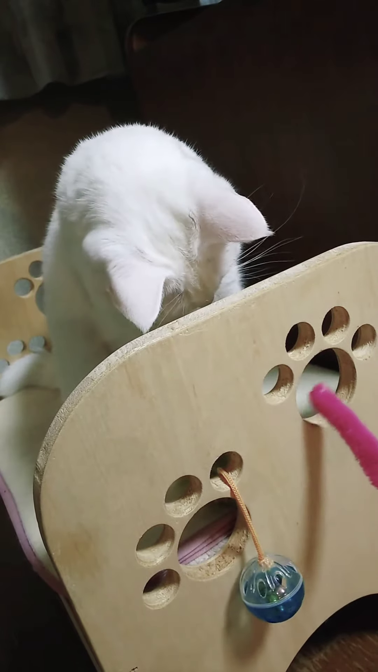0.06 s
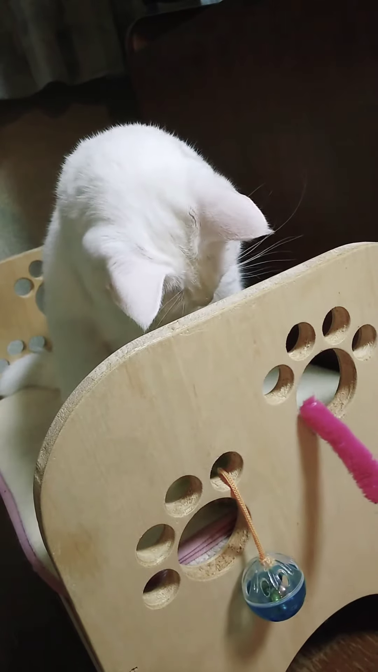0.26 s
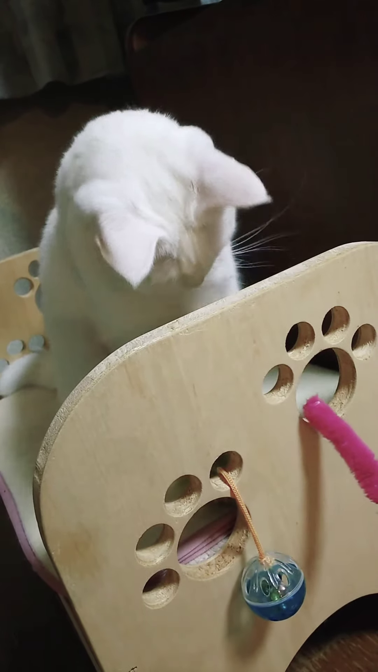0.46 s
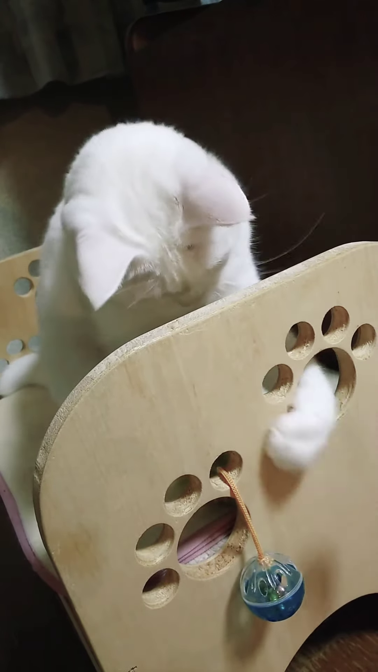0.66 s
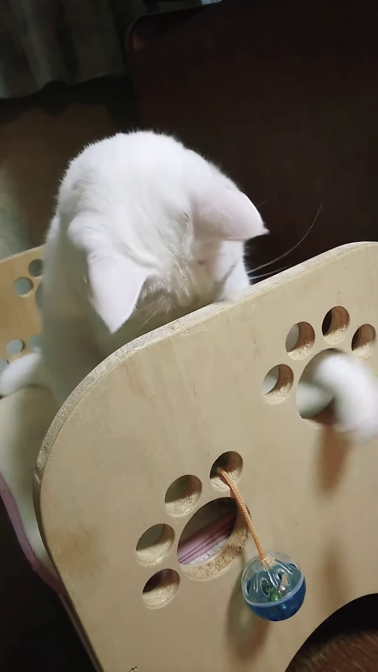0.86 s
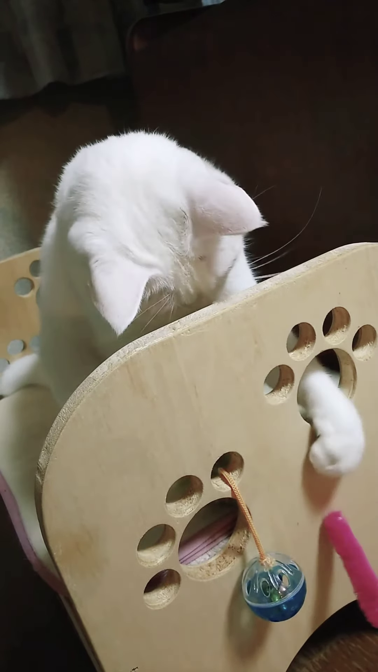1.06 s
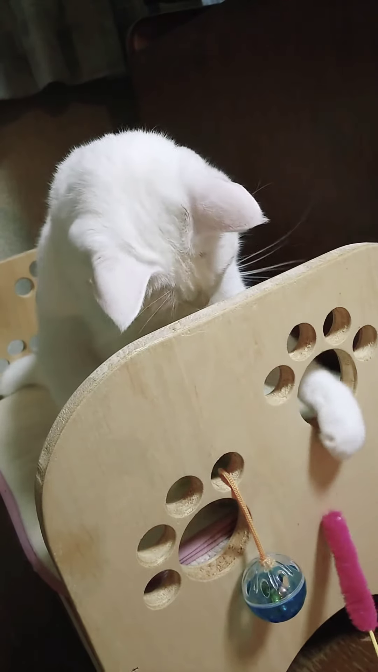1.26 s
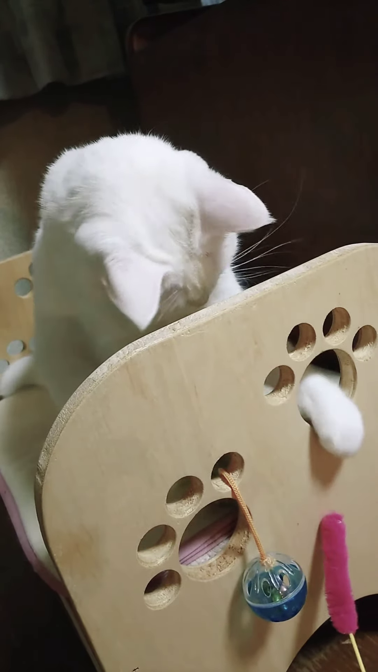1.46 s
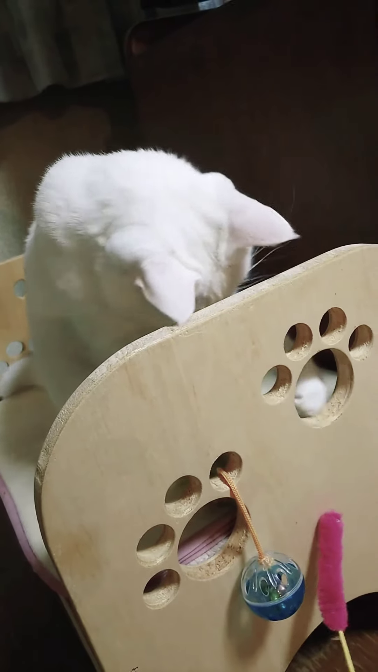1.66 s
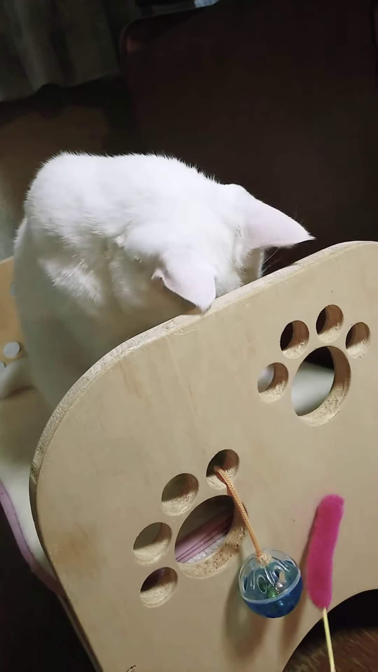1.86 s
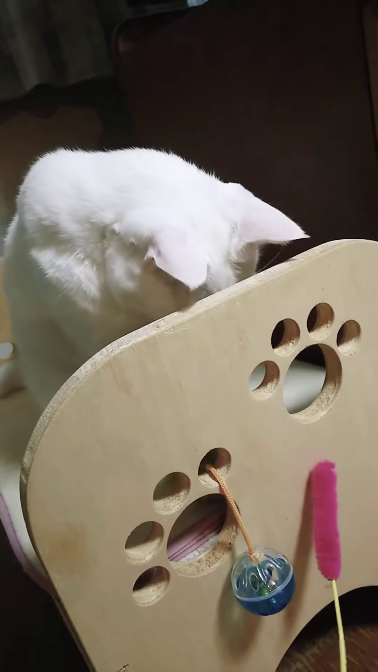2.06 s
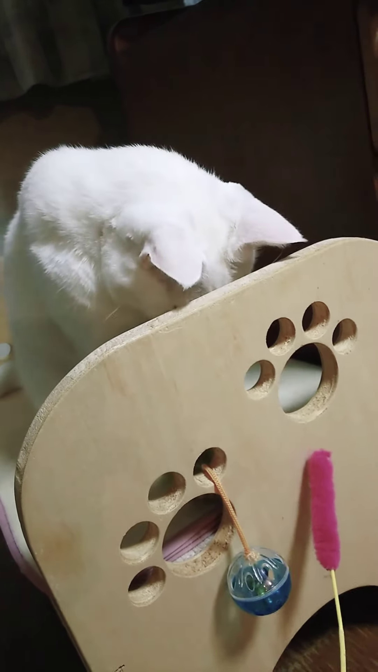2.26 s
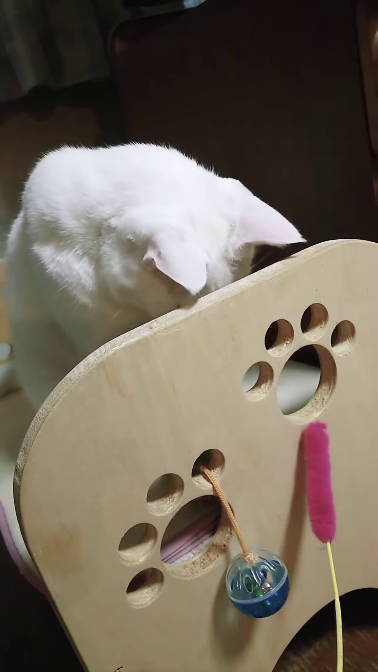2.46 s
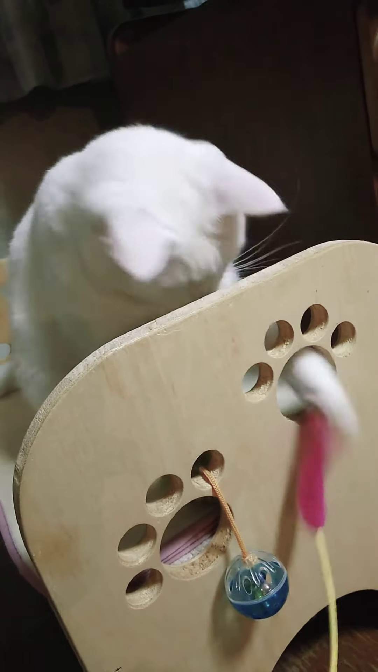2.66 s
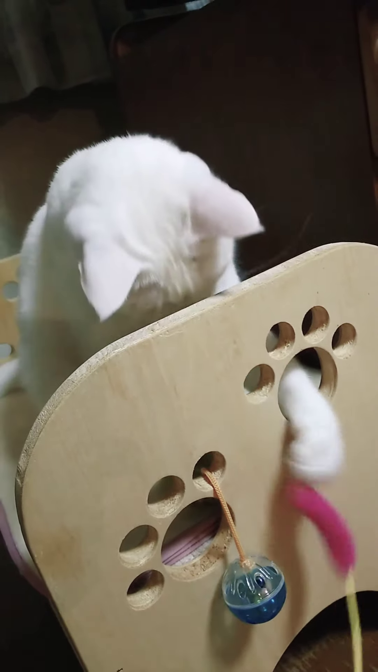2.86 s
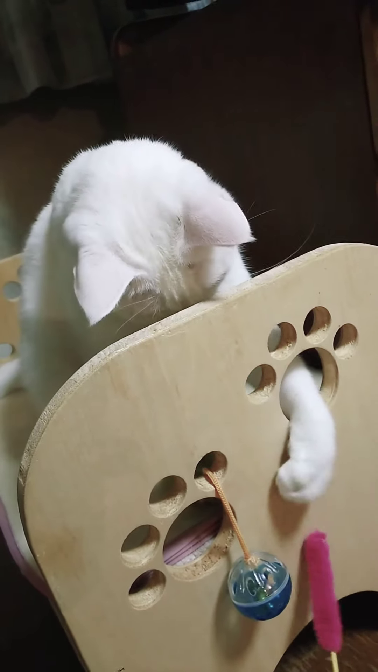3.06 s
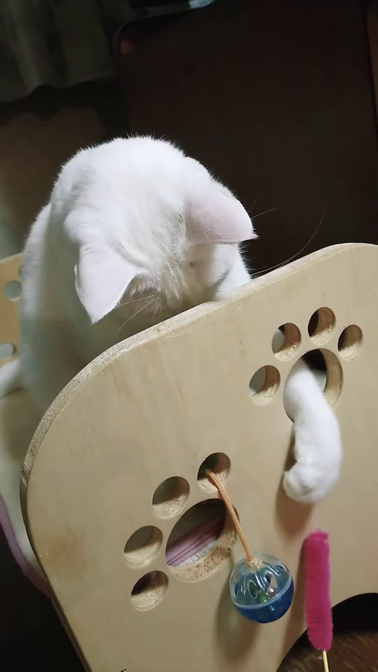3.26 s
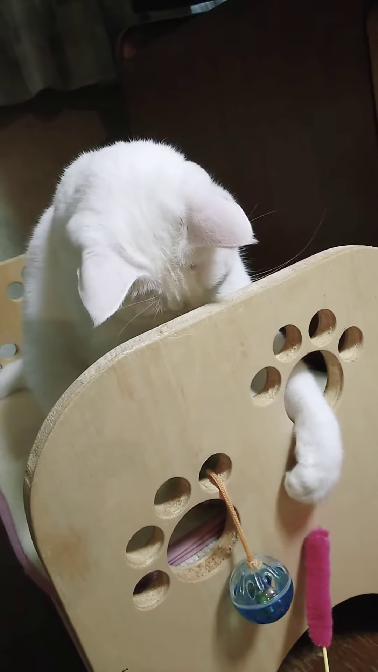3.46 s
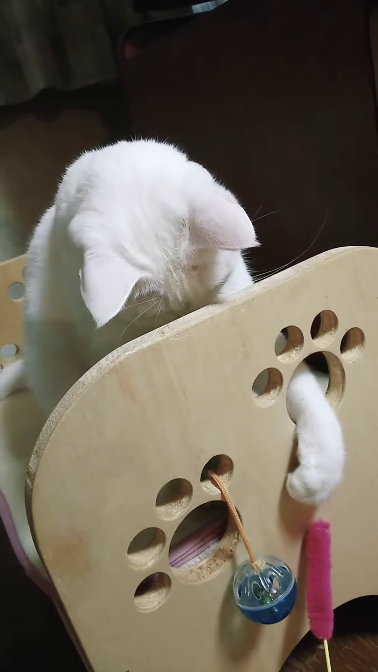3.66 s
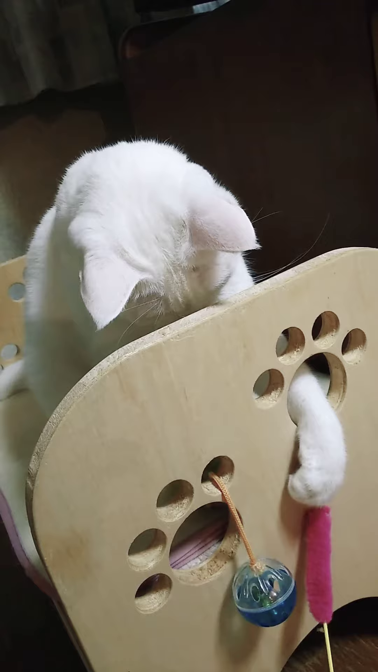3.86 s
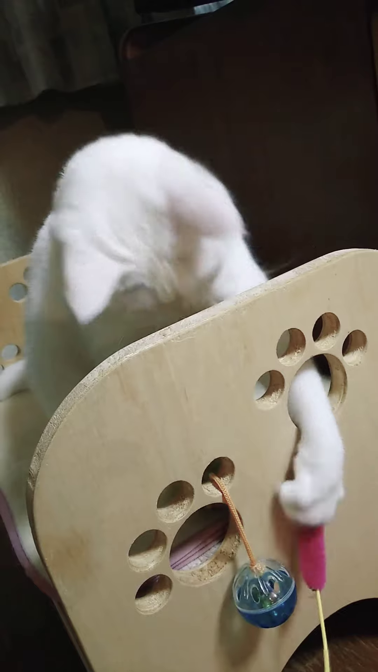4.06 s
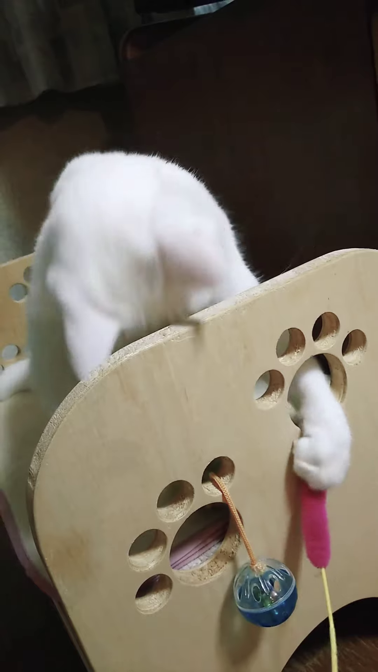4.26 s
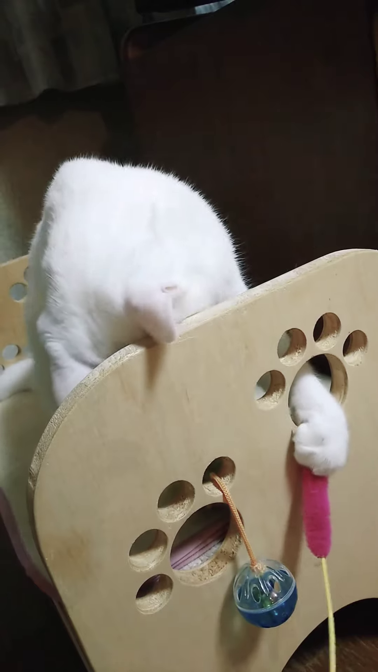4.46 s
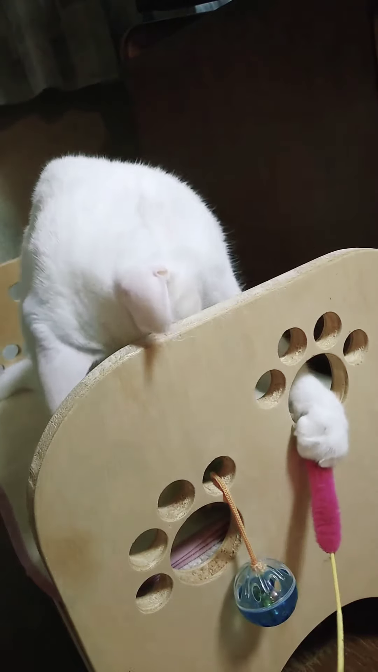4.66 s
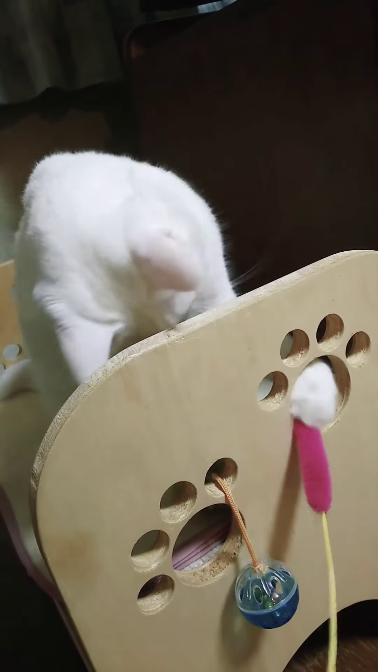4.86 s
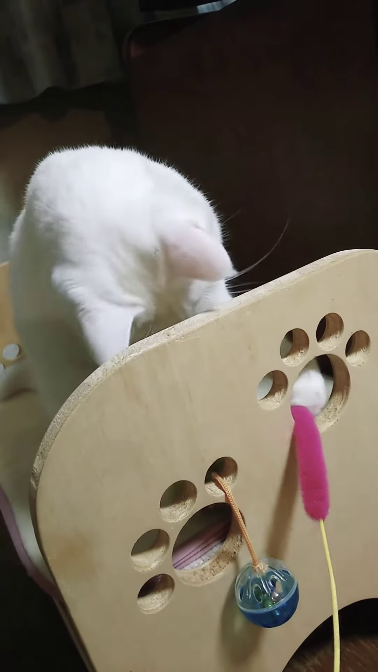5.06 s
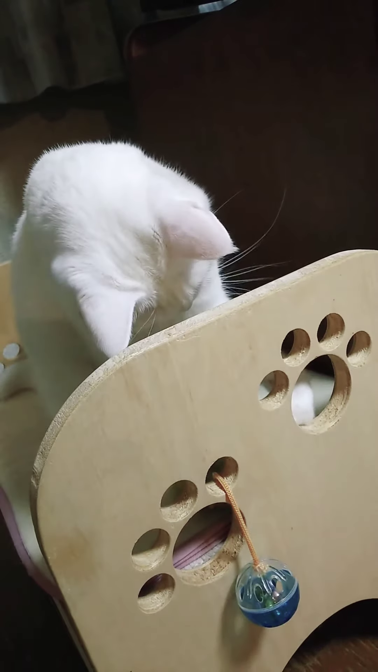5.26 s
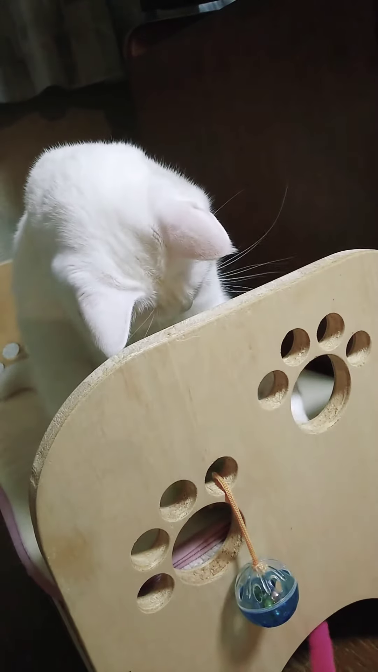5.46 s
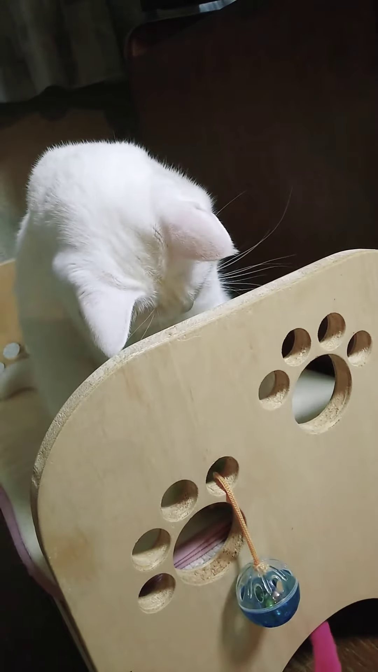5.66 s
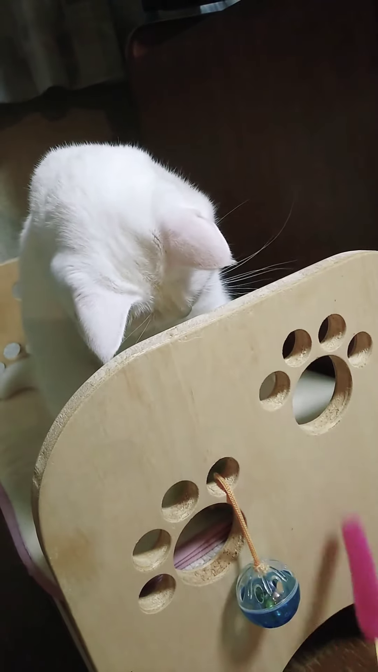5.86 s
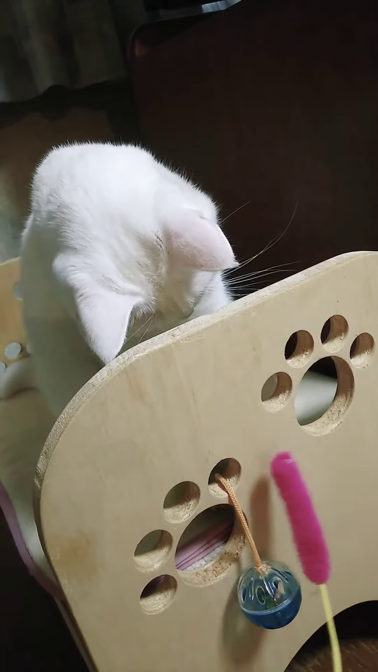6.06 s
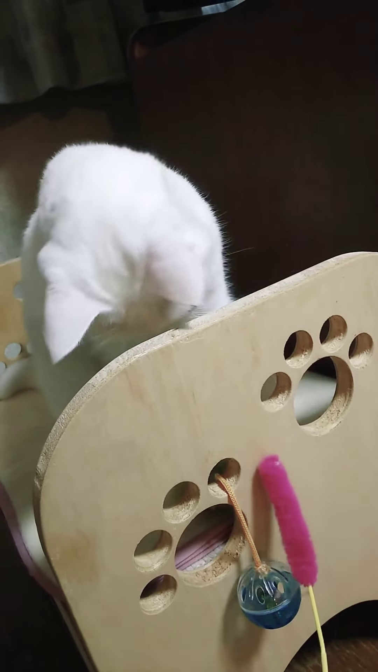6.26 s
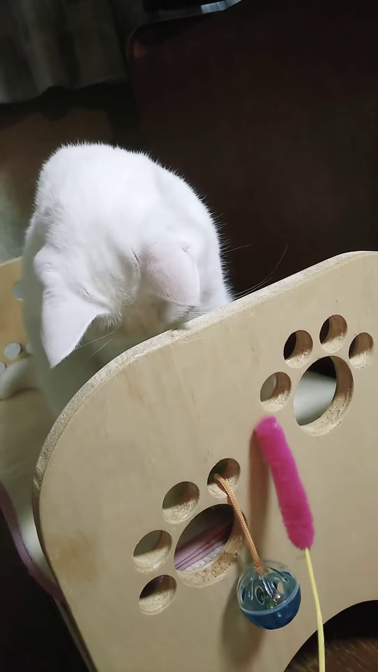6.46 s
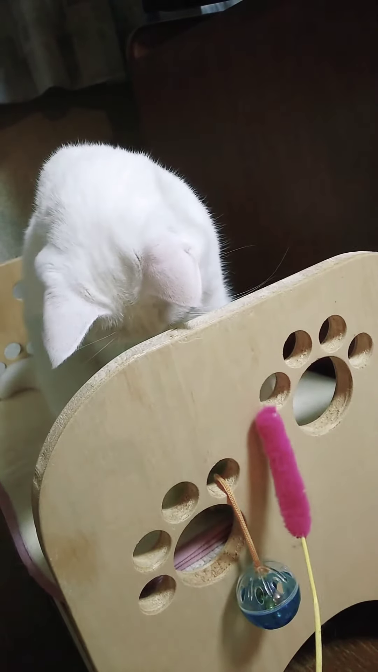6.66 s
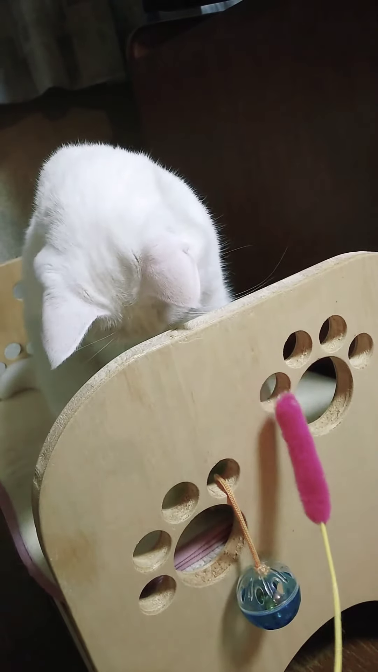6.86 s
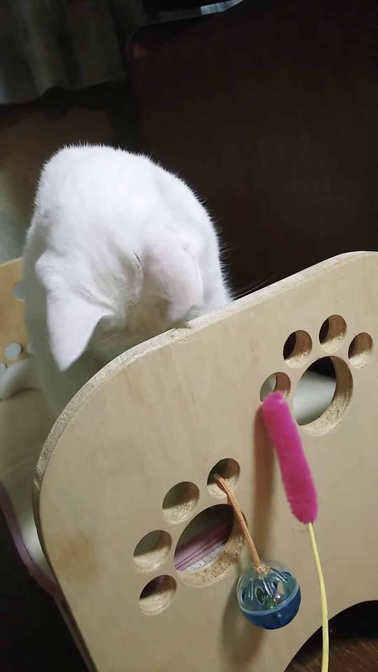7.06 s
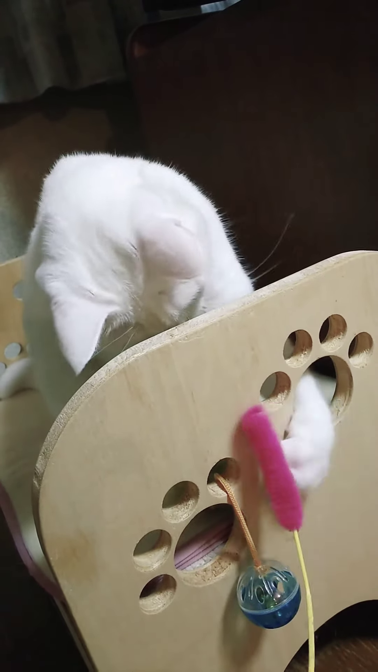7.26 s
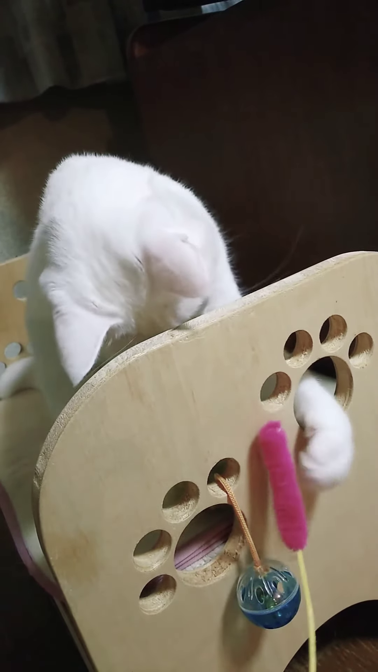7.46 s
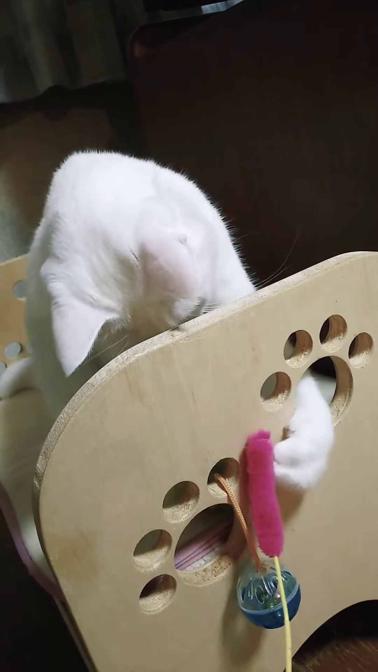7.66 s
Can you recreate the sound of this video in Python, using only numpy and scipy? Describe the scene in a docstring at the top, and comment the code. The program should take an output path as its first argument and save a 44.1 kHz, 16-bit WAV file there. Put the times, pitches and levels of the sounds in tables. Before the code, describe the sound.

Sparse sharp wooden raps and softer thuds from a cat batting a wand toy against its plywood bed, close up indoors over faint hiss and hum.

```python
"""Cat batting a wand toy through a plywood bed

A cat reaches through a hole in its plywood bed and bats a fluffy wand toy; a phone close by hears it in stereo.
The rod knocks and the leg thuds on the panel: a dense crack, then decaying panel modes, in a small echoing room.
When the leg shoves behind the rod it touches twice, and the low modes hum on.
Fur brushes the rim as filtered noise, the leg bumps softly as sagging sines; faint hiss and appliance hum stay behind."""
import sys
import numpy as np
from scipy import signal
from scipy.fft import rfft, irfft, next_fast_len
from scipy.io import wavfile
from scipy.ndimage import uniform_filter1d

SR = 44100
rng = np.random.default_rng(int(sys.argv[2]) if len(sys.argv) > 2 else 0)


def wav_record(signal):
    """Record a signal, one row per channel, as 16-bit PCM in the file named by sys.argv[1]."""
    frames = np.transpose(np.atleast_2d(signal))
    bounded = np.clip(frames, -1, 1)
    # unit amplitude maps onto the largest positive 16-bit level
    quanta = np.round(bounded * 32767).astype(np.int16)
    wavfile.write(sys.argv[1], SR, quanta)


N = 340893
TIME = np.arange(N) / SR


def undb(db):
    """Decibels to gain."""
    return 10 ** (np.asarray(db) / 20)


def along(points, hz):
    """Read (Hz, value) points on a log-frequency axis."""
    f, value = np.transpose(points)
    return np.interp(np.log(np.maximum(hz, 1)), np.log(f), value)


def colour(x, points):
    """Causal minimum-phase filter with the given (Hz, dB) response, made by folding the cepstrum."""
    size = next_fast_len(x.shape[-1] + 4096, real=True) * 2
    hz = np.arange(size // 2 + 1) * SR / size
    cepstrum = irfft(np.log(undb(along(points, hz))))
    cepstrum[1:size // 2] *= 2
    cepstrum[size // 2 + 1:] = 0
    response = np.exp(rfft(cepstrum))
    return irfft(rfft(x, size) * response)[..., :x.shape[-1]]


def unit(x):
    """Scale to rms 1."""
    return x / np.sqrt(np.mean(x ** 2))


def fade(t, t60):
    """Exponential decay, 60 dB down after t60 seconds."""
    return np.exp(-np.log(1000) * t / t60)


def panned(db):
    """Left and right gains for a left-minus-right level difference."""
    return undb(np.array([[db], [-db]]) / 2)


def walk(rate):
    """Smooth random wander of rms 1, heading for a new value about `rate` times a second."""
    k = int(SR / rate)
    steps = np.repeat(rng.standard_normal(N // k + 1), k)
    return unit(uniform_filter1d(steps, k)[:N])


def diffuse(size):
    """Stereo noise from all around: left and right are most alike near 300 Hz, almost unrelated in the treble."""
    # sound from all around: (frequency [Hz], correlation of left and right)
    likeness = [(50, 0.084), (300, 0.61), (700, 0.053), (1200, 0.026), (8000, 0.016)]
    mid, side = rfft(rng.standard_normal((2, size)))
    c = np.clip(along(likeness, np.arange(len(mid)) * SR / size), -.95, .95)
    mid = mid * np.sqrt((1 + c) / 2)
    side = side * np.sqrt((1 - c) / 2)
    return irfft(np.array([mid + side, mid - side]), size)


def add(out, s, sound):
    """Mix a sound in at a time in seconds."""
    start = int(s * SR)
    part = sound[..., :N - start]
    out[:, start:start + part.shape[-1]] += part


def background(air_db=-53.28, hum_db=-0.63, waver_db=0.4, drift_rad=1.27):
    """Steady hiss of the still room, and an appliance hum whose partials waver in level and phase."""
    # colour of the still room: (frequency [Hz], relative density [dB per Hz])
    air = [(36, -17.5), (50, 4.5), (62, -8), (100, -0.5), (140, 1), (230, -1), (550, -2.5), (1000, -7.5),
           (3000, -10.5), (8700, -14.5), (10000, -23.5), (13500, -23.5)]
    # appliance hum: (frequency [Hz], relative level [dB], phase by which the right leads [rad])
    hum = [(99.5, -60.5, 1.5), (197, -71, 1.16), (297.3, -62.5, 1.05), (595, -73, 1), (640, -66, 1.97),
           (679, -71.5, 0.79), (1254, -70, 1.98)]
    out = unit(colour(diffuse(N), air)) * undb(air_db)
    for hz, db, lead in hum:
        phase = 2 * np.pi * hz * TIME + drift_rad * walk(9.8) + np.array([[0], [lead]])
        level = undb(db + hum_db + waver_db * walk(4.6))
        out = out + level * np.sqrt(2) * np.sin(phase)
    return out


def strokes(fidget_db=-68.5, grain_db=2.0, slip_db=2.0, pan_db=-2.5, rumble_stretch=1.8):
    """Hairs catch and slip on the rim; each stroke has its own share of low rumble and of bright hiss."""
    # fur and plush sliding on wood: (middle [s], half length [s], level [dB],
    #     body under 400 Hz against that level [dB], edge over 4 kHz against that level [dB])
    slides = [(0.655, 0.02, -62, 28.5, 0), (0.668, 0.058, -46, 7.5, -1.5), (0.72, 0.024, -67, 23, -6),
              (1.056, 0.045, -58, 12, -4), (1.308, 0.016, -64, -3, 7), (2.998, 0.086, -56.5, 7, -1.5),
              (3.6, 0.22, -66.5, -12.5, 4.5), (4.29, 0.041, -46, 4, 2.5), (4.438, 0.04, -56.5, -7, -1),
              (4.908, 0.055, -54.5, -4, 4.5), (5.213, 0.057, -58, -12, 5.5), (5.96, 0.12, -69.5, -12, 6.5),
              (7.222, 0.015, -41.5, 3, 1), (7.61, 0.04, -48.5, -6, -8)]
    # colour of that sliding: (frequency [Hz], relative level [dB])
    fur = [(60, -9), (150, -2), (270, 5), (450, 1), (680, 12), (1000, 4.5), (1290, 5.5), (1550, 5),
           (1950, 4), (2300, 4), (2600, 10), (3400, 3), (4062, 5.5), (4800, 3), (8500, 6), (10500, -7),
           (15000, -16)]
    hiss = edge = undb(fidget_db)  # faint rustle between strokes
    body = 0
    for s, half, db, body_db, edge_db in slides:
        swell = np.exp(-((TIME - s) / half) ** 2 / 2)
        rumble_swell = np.exp(-((TIME - s) / (half * rumble_stretch)) ** 2 / 2)
        hiss = hiss + undb(db) * swell
        edge = edge + undb(db + edge_db) * swell
        body = body + undb(db + body_db) * rumble_swell
    grain = undb(grain_db * walk(900) + slip_db * walk(110))
    friction = unit(colour(diffuse(N) * grain, fur))
    low = signal.sosfiltfilt(signal.butter(2, 400, "low", fs=SR, output="sos"), friction)
    high = signal.sosfiltfilt(signal.butter(2, 4000, "high", fs=SR, output="sos"), friction)
    return (body * low + hiss * (friction - low - high) + edge * high) * panned(pan_db)


def uneven(points):
    """Each struck spot drives some of the crowded upper modes and misses others, leaving humps and gaps."""
    hz = np.geomspace(60, 15000, 110)
    depth_db = np.clip(hz / 1000 - .5, 0, 1) * 3
    humps = depth_db * rng.standard_normal(len(hz))
    # random humps add power on average; take it off again
    excess = np.log(10) / 20 * depth_db ** 2 * 2 / 3
    return np.transpose([hz, along(points, hz) + humps - excess])


def panel(t, spots_hz, hold_s, rise_s=0.00061, crack_t60=0.039, ring_db=-2, favour_db=6,
          spread_s=0.00065, build_cycles=1.17, apart_hz=1500, port_lag_s=0.00018):
    """One blow: a dense crack while bending waves cross the board, then its separate modes ring on."""
    # plywood panel modes: (frequency [Hz], relative level [dB], t60 [s])
    modes = [(65, 3.5, 0.16), (108.4, 11, 0.57), (135, 1.5, 0.052), (347, 8, 0.21), (393, 4.5, 0.26),
             (503, 5, 0.029), (564, 3, 0.12), (655, 11, 0.087), (750, 8.5, 0.023), (1290, 5.5, 0.048),
             (1776, 6.5, 0.075), (1940, 5, 0.18), (2058, 10, 0.038), (2552, 12.5, 0.047), (2980, 14, 0.038),
             (3140, 9.5, 0.11), (3620, 13, 0.18), (4062, 13.5, 0.041), (4710, 12, 0.037), (5437, -2, 0.077),
             (5985, 4, 0.071), (6840, 16, 0.069), (7410, 4, 0.046), (7650, 12, 0.07), (8680, 13, 0.026)]
    # crowd of quickly damped modes that makes the crack: (frequency [Hz], relative level [dB])
    crowd = [(60, -44), (230, -11), (500, -11), (760, -17), (950, -15), (1300, -4), (1600, -6.5),
             (1850, 2.5), (3000, 2), (5500, 3.5), (8900, 3.5), (9900, -11), (12500, -11.5), (15000, -37)]
    crack = diffuse(len(t)) * fade(np.maximum(t - hold_s, 0), crack_t60) * (1 - np.exp(-t / rise_s))
    crack = colour(crack / np.sqrt(np.sum(crack ** 2) / 2), uneven(crowd))

    hz, db, t60 = np.transpose(modes)[:, :, None]
    lean_db, turn, skew, detune = rng.standard_normal((4, len(modes), 1))
    apart = np.minimum(hz / apart_hz, 1)  # short waves reach the two ports differently
    # a blow on an antinode drives that mode hardest
    nearest = np.argmin(np.abs(hz - np.array(spots_hz)), axis=0)
    favoured = np.isin(np.arange(len(modes)), nearest)[:, None]
    size = undb(db + ring_db + favour_db * favoured) * 2 * np.log(1000) / (t60 * SR)
    rings = size * fade(t, t60) * (1 - np.exp(-t / (spread_s + build_cycles / hz)))  # low modes swell slowly
    phase = 2 * np.pi * (hz * (1 + 0.0034 * detune) * t + turn)
    ports = []
    for side in (1, -1):  # left, right; the ring reaches the left port later
        shift = side * (0.68 * skew * apart - np.pi * hz * port_lag_s)
        ports.append(np.sum(rings * undb(side * lean_db * apart) * np.sin(phase + shift), axis=0))
    return crack + np.array(ports)


def blow(db, dullness, spots_hz, lift_db, weight, pivot_hz=2400, spot_octaves=0.41,
         contact_s=0.0039, contact_doubling_db=37.5):
    """A light contact is brief, a dull one tilts to the bass; the spot makes pitches near its own louder or softer."""
    hz = np.geomspace(100, 12000, 29)
    tilt = -dullness * np.log2(np.clip(hz, 500, 8000) / pivot_hz)
    spot = lift_db * np.exp(-(np.log2(hz / spots_hz[0]) / spot_octaves) ** 2 / 2)
    hold_s = contact_s * 2 ** (db / contact_doubling_db)  # a harder blow draws the crack out
    sound = panel(np.arange(SR // 3) / SR, spots_hz, hold_s)
    return colour(sound, np.transpose([hz, db + tilt + spot + along(weight, hz)]))


def knocks(delay_s=0.00034, tip_lead_s=0.0076, tip_db=-8.5, tip_hz=1885, tip_lift_db=3, shade_db=6):
    """Taps, thuds and shoves on the panel; the right port faces the board and gets more snap."""
    # knocks of the rod and dull thuds of the leg on the panel: (time [s], level [dB],
    #     dullness [dB per octave], pitch of the struck spot [Hz], lift there [dB],
    #     second mode driven hard [Hz], left minus right [dB], leg shoves behind the rod [bool])
    hits = [ (0.6506, -24, -2, 5900, -2, 4062, 0, False), (0.6905, -7.5, 5.5, 2058, 4, 4062, 1.5, False),
            (0.7045, -14.5, 5.5, 2058, 3.5, 655, -1, False), (0.7105, -20, 3.5, 2552, -1, 4062, -2, False),
            (1.058, -23.5, 4, 348, 16, 5900, 0, False), (1.1016, -27, 5.5, 2552, 9, 1290, 0, False),
            (1.1075, -25, 4, 2552, 6, 5985, 2, False), (1.2901, -33, 2, 5900, 5, 7800, 0, False),
            (1.426, -30, 9, 750, -5, 655, 2, False), (1.558, -30.5, 2, 2552, 3, 5900, 5, False),
            (2.7712, 13.5, -1, 655, 3, 3140, 0.5, True), (2.79, -16, 9, 230, 18, 347, 3, False),
            (2.8125, -4.5, 8.5, 400, -1, 750, -5, False), (2.835, -6.5, 7.5, 348, 6, 393, -3.5, False),
            (2.852, -15.5, 10, 140, 3, 347, -2, False), (4.1135, 16.5, 3.5, 1800, 4, 1290, -0.7, False),
            (4.2365, -27, 9, 800, 11, 503, -1, False), (4.2537, -23, 5, 2058, 7, 1290, -3, False),
            (4.3212, -4.5, 2, 4062, 2, 7410, -1, False), (4.324, -11.5, 7, 655, 0, 135, 0, False),
            (4.8723, -22, 3.5, 655, 7.5, 2986, -6, False), (4.8895, -13.5, 4.5, 655, -2.5, 2552, 6, False),
            (4.895, -20.5, 3.5, 2980, 1, 655, -7, False), (4.9232, -28, -1, 7800, 1, 4062, -7, False),
            (5.1896, -22.5, 0, 4710, -4.5, 8680, -6, False), (5.196, -21, 3.5, 655, 1.5, 2058, 1, False),
            (7.183, -23, 11.5, 655, -7.5, 750, -1, False), (7.2150, 9.5, 2.2, 4710, 3, 2058, -0.5, False),
            (7.2946, 12, -1, 1800, 1.5, 750, -1.5, True), (7.6075, -6.5, 4.5, 2058, 2.5, 4062, -0.5, False),
            ]
    # weight of a contact without a shove: (frequency [Hz], level [dB])
    plain = [(110, -14.5), (170, -4.5), (280, -4), (390, -10), (520, 0), (750, -2), (1300, 0.5), (1600, 0)]
    # weight with the leg shoving behind the rod: (frequency [Hz], level [dB])
    leg_behind = [(110, 6), (170, 12), (320, 9), (500, 1), (750, 5.5), (1100, 6.5), (1600, 0)]
    out = np.zeros((2, N))
    for s, db, dullness, spot_hz, lift_db, second_hz, pan_db, shove in hits:
        weight = leg_behind if shove else plain
        contacts = [(delay_s, blow(db, dullness, [spot_hz, second_hz], lift_db, weight))]
        if shove:  # the tip of the rod lands first
            contacts += [(-tip_lead_s, blow(db + tip_db, dullness, [tip_hz], tip_lift_db, leg_behind))]
        for delay, sound in contacts:
            add(out, s + delay, sound * panned(pan_db))
    # right minus left: (frequency [Hz], difference [dB])
    facing = [(3500, -0.85), (6000, shade_db / 2), (8500, shade_db), (11000, -0.3)]
    left = colour(out[0], [(f, -d / 2) for f, d in facing])
    right = colour(out[1], [(f, d / 2) for f, d in facing])
    return np.array([left, right])


def bump(push_s=0.0018, hold_s=0.025, t60=0.1, sag_octaves_per_s=22.6):
    """Soft flesh pushes slowly, so only a low thud comes out, its pitch falling as the flesh settles."""
    # padded bumps of the leg: (time [s], starting pitch [Hz], level [dB])
    thuds = [(0.954, 135, -41.5), (1.017, 97, -52)]
    out = np.zeros((2, N))
    t = np.arange(SR // 2) / SR
    envelope = fade(np.maximum(t - hold_s, 0), t60) * (1 - np.exp(-t / push_s))
    for s, hz, db in thuds:
        phase = 2 * np.pi * np.cumsum(hz * 2 ** (-sag_octaves_per_s * t)) / SR
        add(out, s, undb(db) * np.sin(phase) * envelope)
    return out


def room(x, first_s=0.0019, build_s=0.014, wall_s=0.024, wall_width_s=0.0079, wall_share=0.36):
    """Echoes of a small furnished room build up quickly, bunch as the near walls answer, and die by band."""
    # room echo: (frequency [Hz], level against the direct sound [dB], t60 [s])
    bands = [(110, 4, 0.26), (345, -3.5, 0.17), (683, -10, 0.31), (2000, -9.5, 0.29), (4970, -7.5, 0.24),
             (10000, -10, 0.23)]
    t = np.arange(SR * 3 // 4) / SR
    noise = rfft(diffuse(len(t)))
    hz = np.arange(noise.shape[1]) * SR / len(t)
    walls = 1 + wall_share * np.exp(-((t - wall_s) / wall_width_s) ** 2)
    onset = np.clip((t - first_s) / build_s, 0, 1) * walls
    tail = 0
    for k, (_, db, t60) in enumerate(bands):
        share = along([(row[0], j == k) for j, row in enumerate(bands)], hz)  # crossfade to the neighbours
        shape = onset * fade(t, t60)
        tail = tail + irfft(noise * share, len(t)) * shape * undb(db) / np.sqrt(np.sum(shape ** 2))
    return x + signal.fftconvolve(x, tail, axes=1)[:, :N]


def scene():
    """The cat's play in the room, the dry bumps of its leg, and the background."""
    return room(knocks() + strokes()) + bump() + background()


def record(dry, ceiling=.92, top_hz=14300):
    """The phone rounds the highest peaks and cuts the top."""
    rounded = dry / (1 + (dry / ceiling) ** 6) ** (1 / 6)
    return signal.sosfilt(signal.ellip(8, .2, 70, top_hz, fs=SR, output="sos"), rounded)


dry = scene()
out = record(dry)
wav_record(out)
```